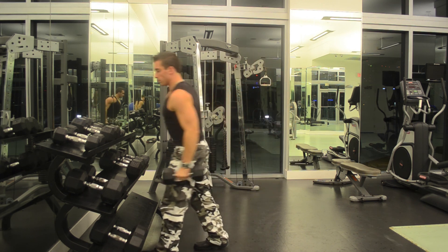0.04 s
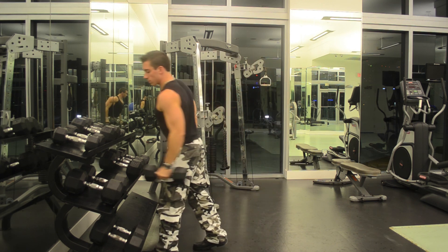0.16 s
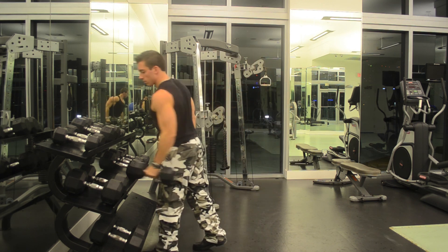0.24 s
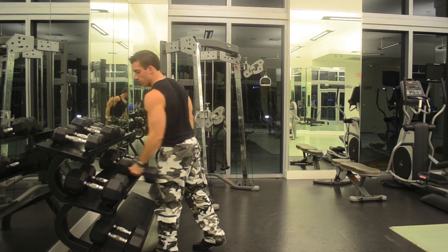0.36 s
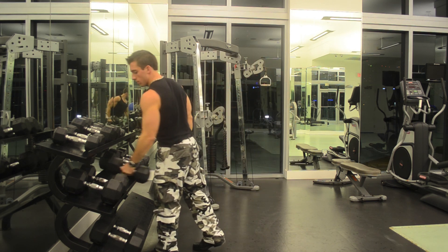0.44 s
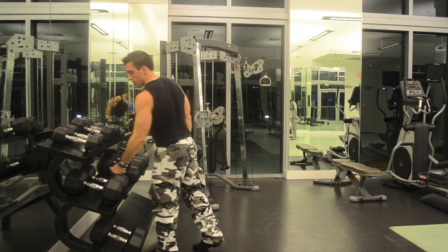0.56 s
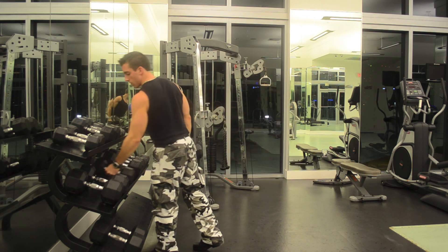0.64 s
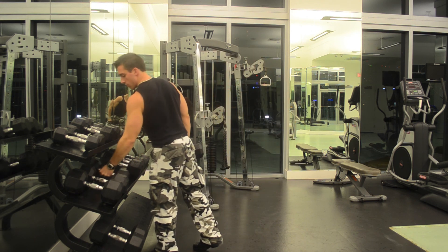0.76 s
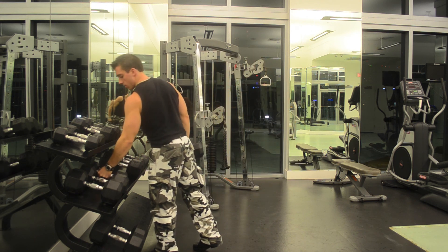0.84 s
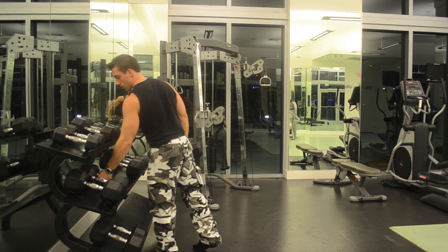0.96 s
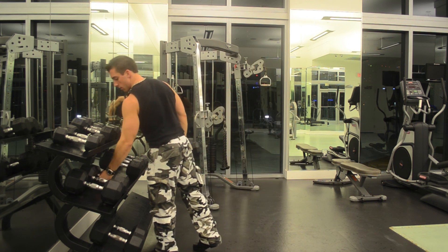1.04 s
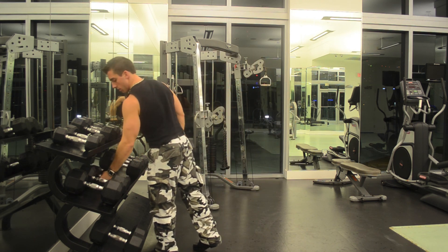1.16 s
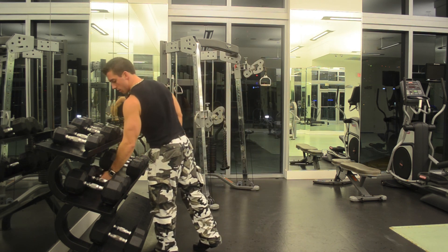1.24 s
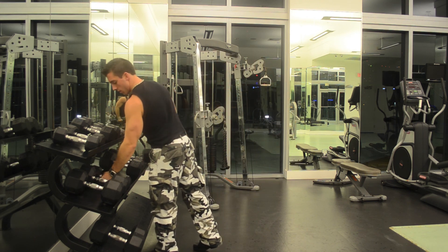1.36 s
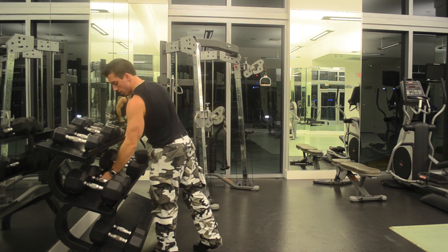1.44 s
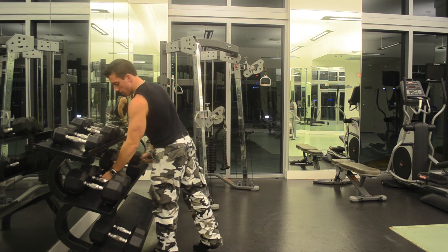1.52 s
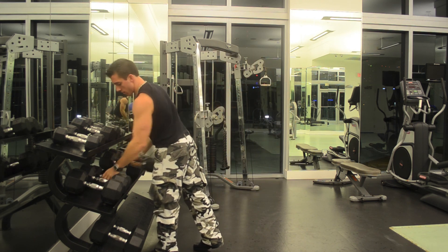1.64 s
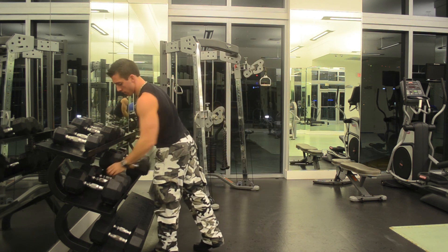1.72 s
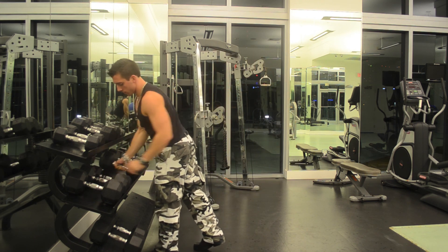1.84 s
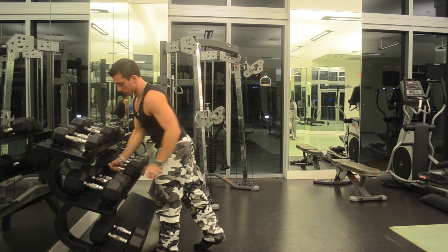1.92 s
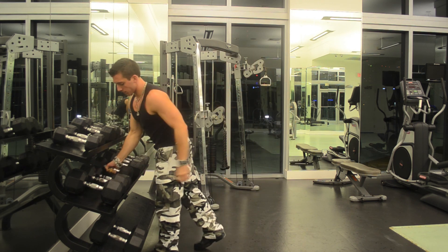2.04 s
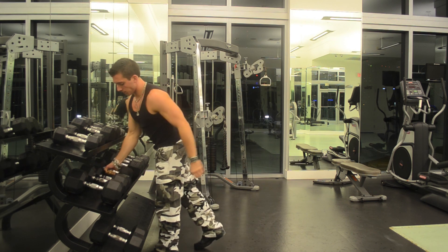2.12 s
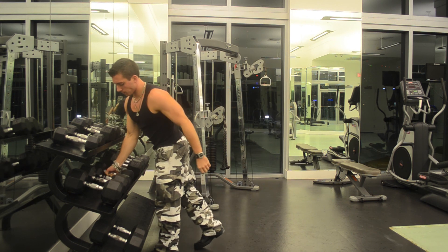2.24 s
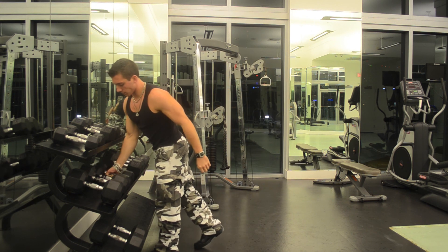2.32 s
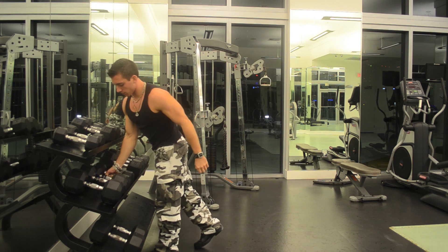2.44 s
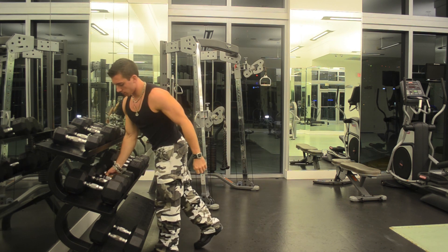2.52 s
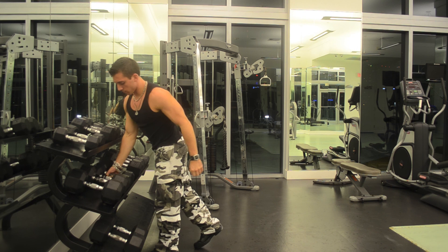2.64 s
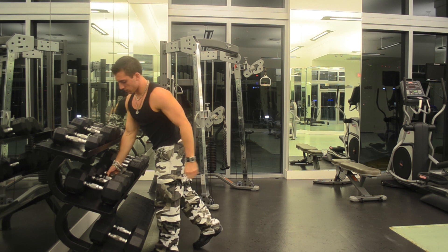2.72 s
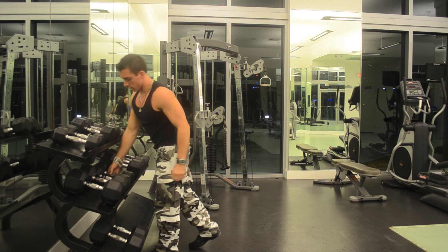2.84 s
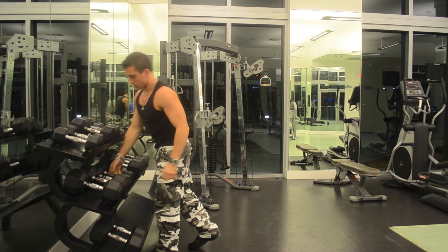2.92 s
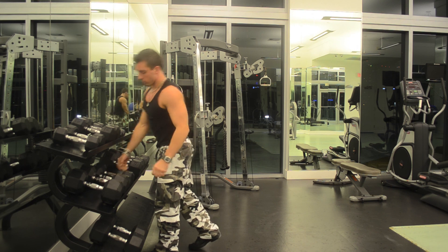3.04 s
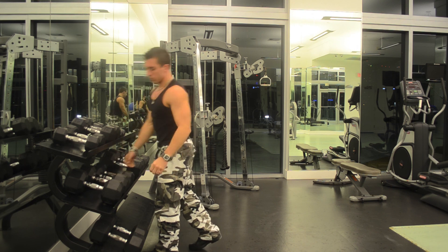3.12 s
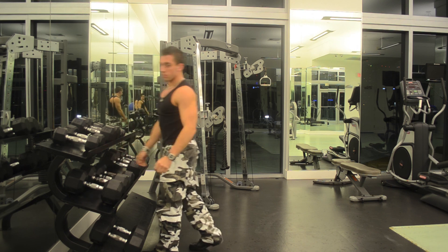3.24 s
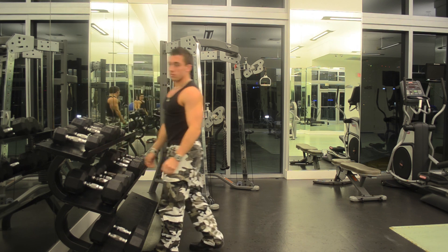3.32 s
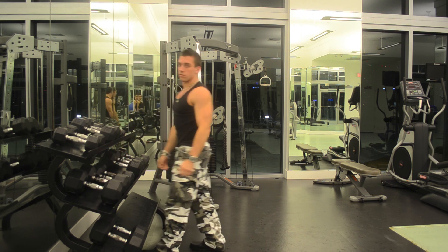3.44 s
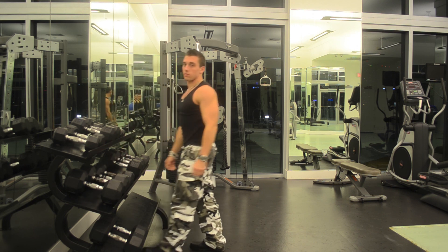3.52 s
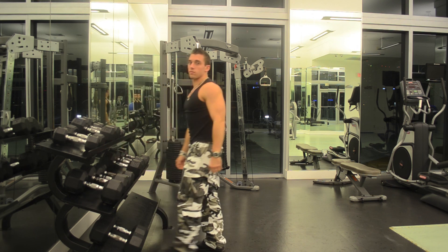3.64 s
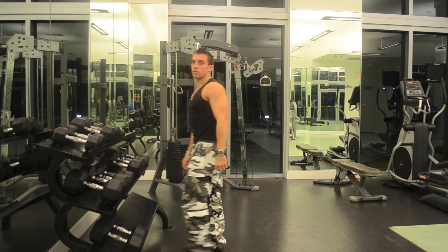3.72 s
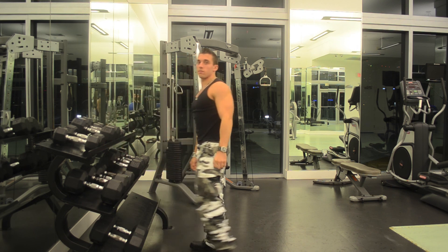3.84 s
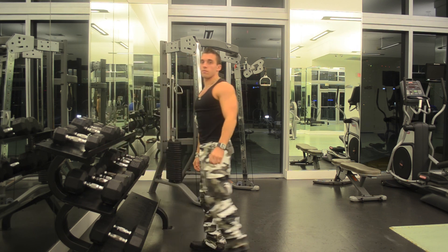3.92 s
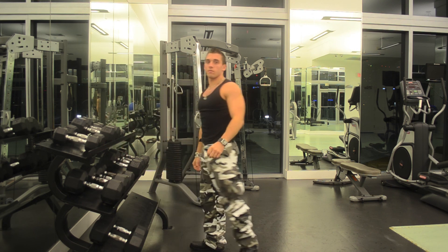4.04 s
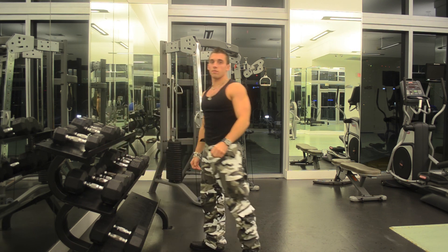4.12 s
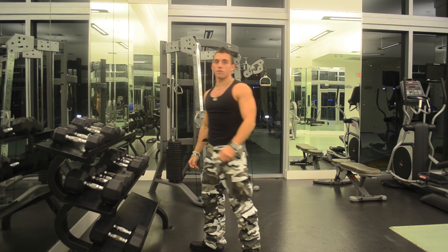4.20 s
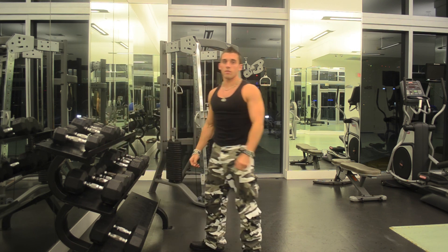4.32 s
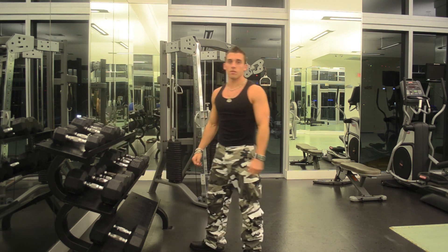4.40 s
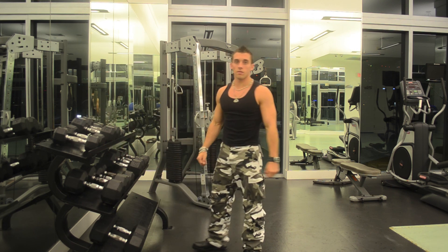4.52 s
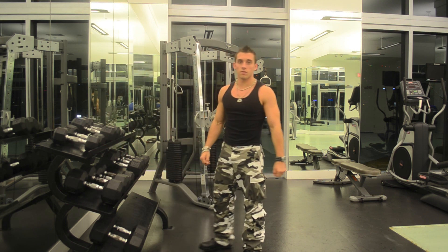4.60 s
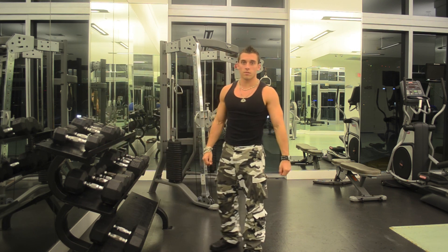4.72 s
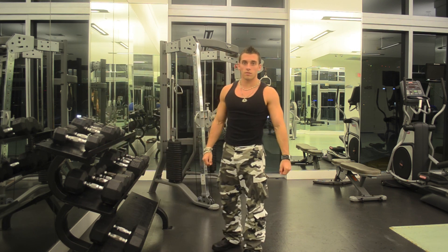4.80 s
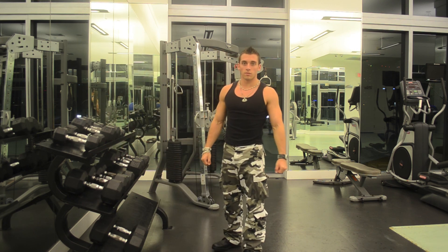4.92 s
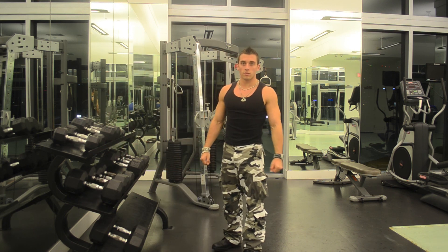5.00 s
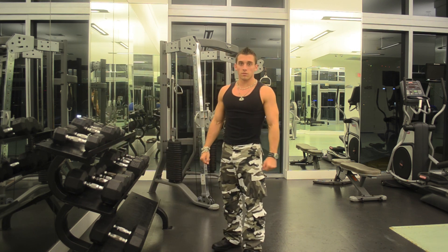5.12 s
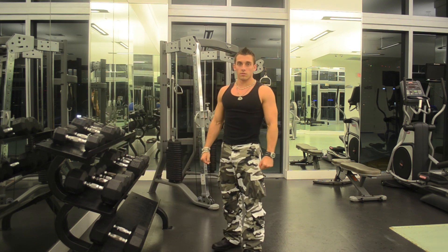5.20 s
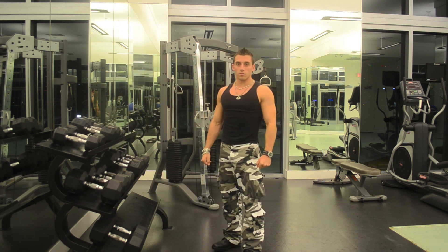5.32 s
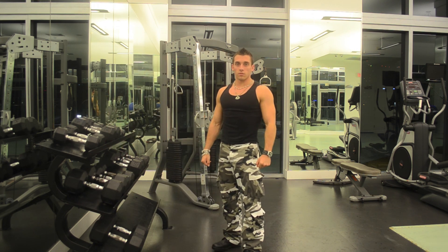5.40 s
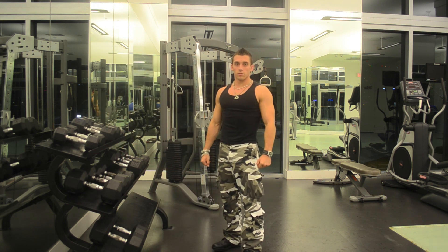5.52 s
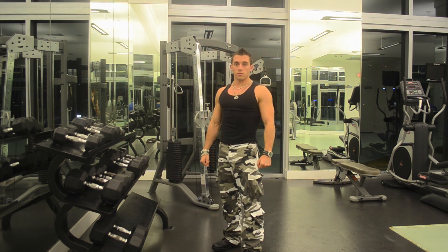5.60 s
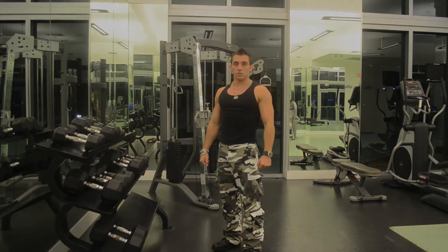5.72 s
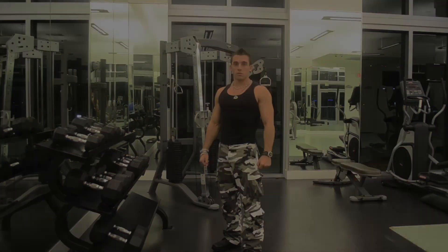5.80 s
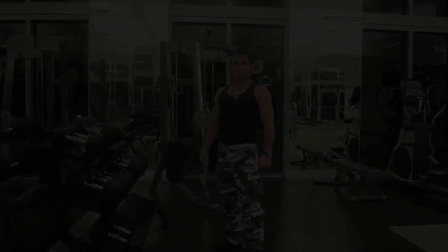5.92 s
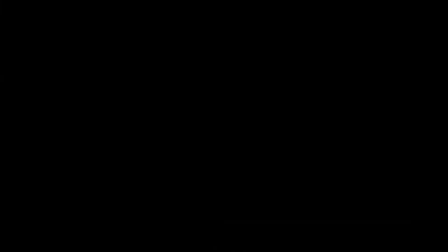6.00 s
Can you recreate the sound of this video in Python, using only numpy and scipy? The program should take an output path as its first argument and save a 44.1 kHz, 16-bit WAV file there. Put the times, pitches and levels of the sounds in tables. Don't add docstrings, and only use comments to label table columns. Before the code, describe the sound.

One loud metallic clank and, a second later, a softer, lower cluster of knocks on a metal rack, over steady ventilation rumble that fades out.

```python
import sys
import numpy as np
from scipy import signal
from scipy.fft import rfft, irfft
from scipy.io import wavfile
from scipy.ndimage import uniform_filter1d

SR = 44100
rng = np.random.default_rng(int(sys.argv[2]) if len(sys.argv) > 2 else 0)


def to_wav(sig):
    pcm = np.clip(np.atleast_2d(sig), -1, 1) * 32767
    pcm = np.round(pcm).astype(np.int16)
    wavfile.write(sys.argv[1], SR, pcm.T)


def convert_level_to_amplitude(level_db):
    exponent = np.asarray(level_db, float) / 20
    return 10 ** exponent


N = 267069

# (frequency [Hz], density [dB per Hz])
AIR_SPECTRUM = [(20, -20), (70, -7), (102, -13.5), (150, -5.5), (300, -10.5), (1000, -15.5), (2000, -23),
                (3200, -34), (4000, -41), (5000, -46.5), (6300, -51), (10000, -58), (14000, -61),
                (15600, -67.5)]
# (frequency [Hz], bandwidth [Hz], level [dB])
DRONE_TONES = [(134.4, 12.5, -41), (198.8, 6.8, -47), (218, 26, -46.5), (364.5, 24, -52)]
# (frequency [Hz], level [dB])
MAINS_HUM = [(59.2, -36)]
# (middle time [s], half length [s], level [dB])
BRUSHES = [
    (0.342, 0.042, -69),
    (.75, .12, -75),
    (1.52, 0.095, -72),
    (2.07, 0.072, -66),
    (2.38, .03, -63.5),
    (3.825, 0.24, -72),
    (4.26, .04, -73),
]
# (frequency [Hz], level [dB])
CLOTH_SPECTRUM = [(3000, -11), (6000, -6.5), (9000, -5.5), (10500, -6.5), (12500, -10.5), (15000, -22.5)]
# (time [s], level [dB], centre [Hz], bandwidth [Hz])
SMALL_TICKS = [
    (0.313, -53.5, 7900, 8960),
    (1.509, -52.5, 10000, 9340),
    (2.078, -51, 4470, 500),
    (2.736, -57, 11000, 8000),
    (2.9457, -52, 9100, 9000),
    (3.072, -49.5, 10200, 8900),
    (3.1616, -48, 9800, 9000),
    (3.439, -55, 9400, 9000),
    (4.2306, -47, 9700, 1500),
    (4.7800, -57, 11000, 7000),
]
# (frequency [Hz], t60 [s])
ROOM_DECAY = [(100, 0.78), (250, 2.44), (600, 1.6), (1200, 1.65), (2500, 2.06), (5000, .5), (10000, .2)]
# (time [s], strength [dB], struck spot's pitch [Hz], crack level [dB])
CLANK_CONTACTS = [
    (1.0235, -10.5, 834, -54),
    (1.0365, -17.5, 330, -67),
    (1.0480, -14.5, 700, -69.5),
    (1.0740, -12.5, 530, -76.5),
    (1.4580, -28.5, 880, -84),
]
# (time [s], strength [dB], struck spot's pitch [Hz], crack level [dB])
KNOCK_CONTACTS = [
    (2.3065, -26.5, 1100, -67.5),
    (2.3170, -18, 158, -88),
    (2.3510, -24, 457, -67),
    (2.3570, -24.5, 155, -84),
    (2.3640, -20.5, 322, -80.5),
    (2.3970, -28, 305, -84),
    (2.4420, -26, 415, -87),
    (2.5430, -27.5, 285, -85),
    (2.6600, -36.5, 415, -91),
]
# (frequency [Hz], level [dB], t60 [s])
NEAR_MODES = [(92, -10.5, .3), (145.5, -5.5, 0.16), (186, 4, 0.072), (219.5, -10, 0.28), (291, -16.5, 0.28),
              (311.6, -2, 0.17), (366, -26, .15), (430, -11, .15), (505, -10, 0.26), (551.5, -4, 0.11),
              (636, -23, 0.04), (686, -12, 0.36), (780, 1.5, 0.038), (840, -11, 0.055), (990, -9, .12),
              (1128, -4.5, 0.36), (1262, -8, 0.17), (1315, -1, 0.068), (1580, -24.5, 0.3),
              (1720, -22.5, 0.19), (2173, -20, 0.058), (2420, -36, .05)]
# (frequency [Hz], level [dB], t60 [s])
FAR_MODES = [(97, -35, .2), (155, 4, 0.077), (178, 2, 0.11), (238, -4, 0.21), (285, -1, 0.15),
             (330, 3.5, 0.075), (415, 1, 0.14), (485, 5.5, 0.039), (702, -1, 0.062), (785, -7, 0.047),
             (1024, -20, 0.081), (1380, -23, 0.21), (1556, -15, .06)]
# (frequency [Hz], level [dB])
BODY_SPECTRUM = [(80, -26), (150, -2.5), (300, -1.5), (500, -2.5), (800, -7), (1300, -8.5), (1800, -11),
                 (2500, -20.5), (3300, -36.5), (4500, -46.5), (8000, -67.5)]
# (frequency [Hz], level [dB])
CRACK_SPECTRUM = [(2000, -1.5), (4000, 3), (6500, -5.5), (10000, -12.5), (15000, -21.5)]
# (time [s], level [dB])
RATTLE_KNOCKS = [
    (2.362, -60),
    (2.3700, -63),
    (2.381, -61),
    (2.3885, -48),
    (2.394, -50),
    (2.400, -55),
    (2.405, -55),
    (2.416, -63),
    (2.431, -62),
    (2.459, -65),
]
# (frequency [Hz], bandwidth [Hz], level [dB])
FITTING_MODES = [(9230, 70, -8), (9560, 80, -2), (11700, 60, -9), (11800, 110, -11), (12400, 80, -8),
                 (12600, 50, -0.5), (13800, 50, -9), (14250, 110, -5.5)]

AIR_DB = -34.5
DRONE_DB, SWOLLEN_DB, STEADY_S = 2.5, 10.5, 0.079
SAG_S, SAG_HALF_S, SAG_DB = 2.35, 0.5, -7.5
CONTACT_CYCLES = 0.37
LONGEST_T60_S = 0.13
WHINE_HZ, WHINE_DB = 15660, -72.0
OPEN_DB, DUCK_S, DUCK_DB, REST_DB, SETTLE_S = 1.2, 0.98, 0.6, -2.5, 0.6
FADE_START_S, FADE_END_S = 5.644, 6.017


def evened(x):
    return x / np.sqrt(np.mean(x ** 2) + 1e-20)


def read(points, hz):
    f, value = np.transpose(points)
    return np.interp(np.log(hz + 1), np.log(f + 1), value)


def add(mix, s, sound):
    part = mix[round(s * SR):][:len(sound)]
    part += sound[:len(part)]


def coloured(points, length=N):
    hz = np.fft.rfftfreq(length, 1 / SR)
    spectrum = rfft(rng.standard_normal(length)) * convert_level_to_amplitude(read(points, hz))
    return evened(irfft(spectrum, length))


def burst(points, t, t60):
    return coloured(points, len(t)) * convert_level_to_amplitude(-60 * t / t60)


def resonate(x, hz, width):
    turn = np.exp(2j * np.pi * hz * np.arange(len(x)) / SR)
    r = np.exp(-np.pi * width / SR)
    return 2 * (turn * signal.lfilter([1 - r], [1, -r], x / turn)).real


def waver(hz, width, steadiness=0.4):
    tone = resonate(rng.standard_normal(N), hz, width)
    tone = evened(resonate(tone, hz, width))
    slow = np.sqrt(uniform_filter1d(tone ** 2, size=5000) + .05)
    return evened(tone / slow ** steadiness)


def drone_swell():
    t = np.arange(N) / SR
    swell = SWOLLEN_DB * np.exp(-t / STEADY_S)
    sag = SAG_DB * np.exp(-((t - SAG_S) / SAG_HALF_S) ** 2)
    return DRONE_DB + swell + sag


def ventilation(patchy_db=0.56, swell_db=0.6):
    hz, t, z = signal.stft(coloured(AIR_SPECTRUM), SR, nperseg=1024, noverlap=768)
    patches = uniform_filter1d(rng.standard_normal(z.shape), size=12, axis=0)
    patches = evened(uniform_filter1d(patches, size=20, axis=1))
    swell = evened(patches[60:200].mean(0))
    drifting = z * convert_level_to_amplitude(patchy_db * patches + swell_db * swell)
    air = signal.istft(drifting, SR, nperseg=1024, noverlap=768)[1][:N]
    drone = sum(convert_level_to_amplitude(db) * waver(f, w) for f, w, db in DRONE_TONES)
    t = np.arange(N) / SR
    hum = sum(convert_level_to_amplitude(db) * np.sqrt(2) * np.sin(2 * np.pi * f * t) for f, db in MAINS_HUM)
    return convert_level_to_amplitude(AIR_DB) * air + convert_level_to_amplitude(drone_swell()) * drone + hum


def cloth():
    t = np.arange(N) / SR
    swells = sum(convert_level_to_amplitude(db) * np.exp(-((t - s) / half) ** 2) for s, half, db in BRUSHES)
    return coloured(CLOTH_SPECTRUM) * swells


def ticks():
    out, t = np.zeros(N), np.arange(1500) / SR
    for s, db, hz, width in SMALL_TICKS:
        click = resonate(rng.standard_normal(len(t)) * np.exp(-t / .0015), hz, width)
        click = resonate(click, hz, width)
        add(out, s, convert_level_to_amplitude(db) * click / abs(click).max())
    return out


def gym(x):
    taps = np.zeros(2 * SR)
    at = np.arange(200, len(taps) - 20, 20)
    taps[at + rng.integers(0, 20, len(at))] = rng.choice([-1., 1.], len(at))
    hz, t, z = signal.stft(taps, SR, nperseg=512)
    decay = convert_level_to_amplitude(-60 * t / read(ROOM_DECAY, hz)[:, None])
    tail = signal.istft(z * decay, SR, nperseg=512)[1]
    return signal.fftconvolve(x, tail / np.sqrt(len(at)))[:N]


def rack(contacts, modes, body_db, body_t60, spot_db):
    out, t = np.zeros(N), np.arange(SR // 2) / SR
    hz, db, t60 = np.transpose(modes)[:, :, None]
    t60 = np.minimum(t60, LONGEST_T60_S)
    for s, blow_db, spot_hz, crack_db in contacts:
        contact_s = CONTACT_CYCLES / spot_hz
        share_db, phase, detune = rng.standard_normal((len(modes), 3)).T[:, :, None]
        share_db = 0.54 * share_db + spot_db * np.exp(-(np.log2(hz / spot_hz) / 0.36) ** 2)
        turns = hz * (1 + 0.012 * detune) * t
        rise = 1 - np.exp(-t * hz / 1.47)
        ringing = rise * convert_level_to_amplitude(db + share_db - 60 * t / t60)
        tone = (ringing * np.sin(2 * np.pi * turns + 3 * phase)).sum(0)

        body = burst(BODY_SPECTRUM, t, body_t60)
        body = 0.74 * body + 1.35 * resonate(body, spot_hz, 0.44 * spot_hz)
        blow = tone + convert_level_to_amplitude(body_db) * body * (1 - np.exp(-t / (1.5 * contact_s)))
        pole = np.exp(-1 / (0.17 * contact_s * SR))
        blow = signal.lfilter([1 - pole], [1, -pole], blow)
        crack = burst(CRACK_SPECTRUM, t, 0.067) * (1 - np.exp(-t / 0.0028))
        add(out, s, convert_level_to_amplitude(blow_db) * blow + convert_level_to_amplitude(crack_db + 16) * crack)
    return out


def fitting():
    out, t = np.zeros(N), np.arange(SR // 4) / SR
    hz, width, mode_db = np.transpose(FITTING_MODES)[:, :, None]
    for s, db in RATTLE_KNOCKS:
        phase = 2 * np.pi * rng.random((len(FITTING_MODES), 1))
        ringing = convert_level_to_amplitude(db + mode_db) * np.exp(-np.pi * width * t)
        add(out, s, (ringing * np.sin(2 * np.pi * hz * t + phase)).sum(0))
    return out


def camera_gain():
    t = np.arange(N) / SR
    sinking_db = REST_DB + (DUCK_DB - REST_DB) * np.exp(-np.maximum(t - DUCK_S, 0) / SETTLE_S)
    ridden_db = uniform_filter1d(np.where(t < DUCK_S, OPEN_DB, sinking_db), size=1500)
    fade = np.clip((FADE_END_S - t) / (FADE_END_S - FADE_START_S), 0, 1)
    return convert_level_to_amplitude(ridden_db) * fade


def scene():
    clank = rack(CLANK_CONTACTS, NEAR_MODES, body_db=1.5, body_t60=0.11, spot_db=9.0)
    knock = rack(KNOCK_CONTACTS, FAR_MODES, body_db=-1.5, body_t60=0.12, spot_db=7.5)
    impacts = clank + knock
    small = fitting() + ticks() + cloth()
    echo = gym(convert_level_to_amplitude(13.0) * impacts + convert_level_to_amplitude(9.0) * small)
    return (impacts + small + echo + ventilation())[None]


def roll_off(x):
    return signal.sosfilt(signal.butter(12, 15720, fs=SR, output="sos"), x)


def record(dry):
    whine = convert_level_to_amplitude(WHINE_DB) * np.sqrt(2) * np.sin(2 * np.pi * WHINE_HZ * np.arange(N) / SR)
    ridden = (dry + whine + .0015) * camera_gain()
    limited = 1.5 * np.tanh(ridden / 1.5)
    return roll_off(limited)


dry = scene()
out = record(dry)
to_wav(out)
```